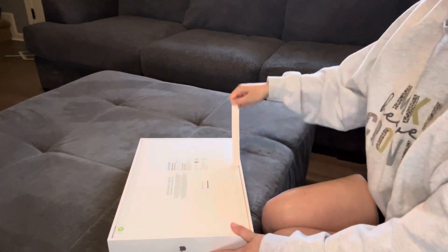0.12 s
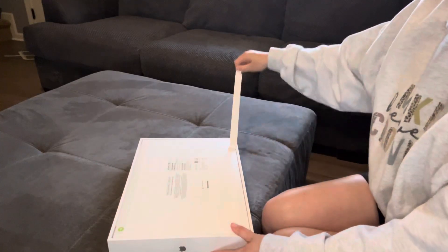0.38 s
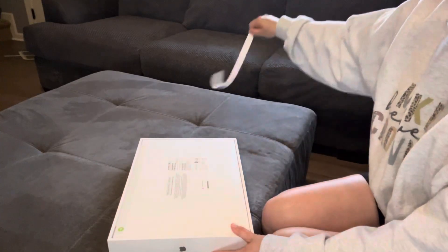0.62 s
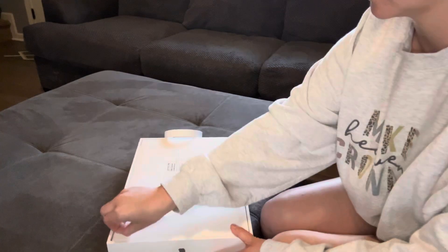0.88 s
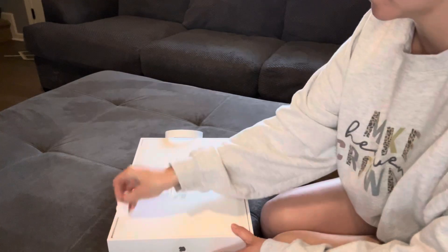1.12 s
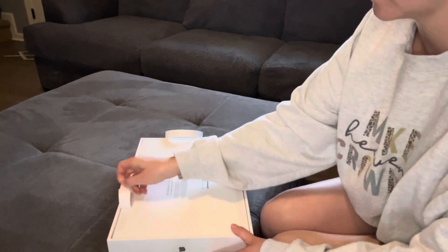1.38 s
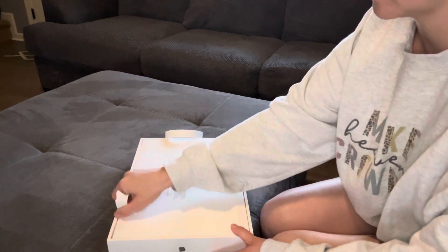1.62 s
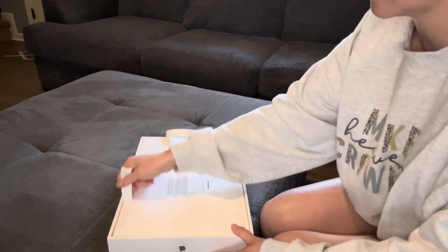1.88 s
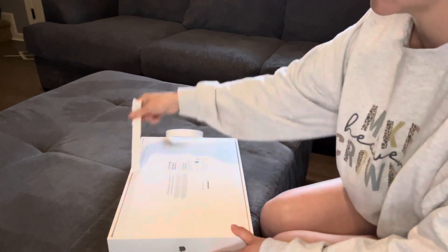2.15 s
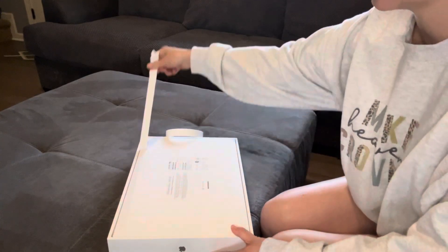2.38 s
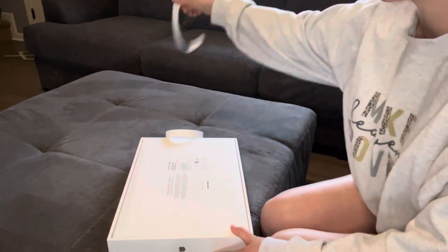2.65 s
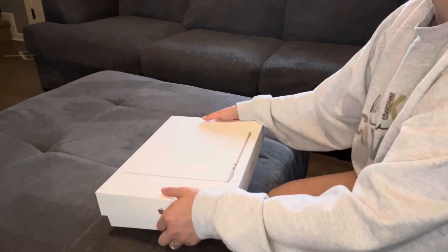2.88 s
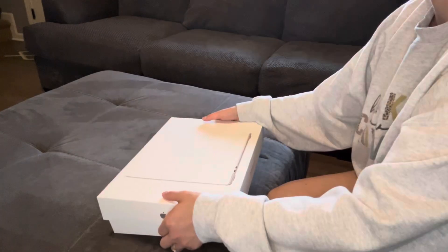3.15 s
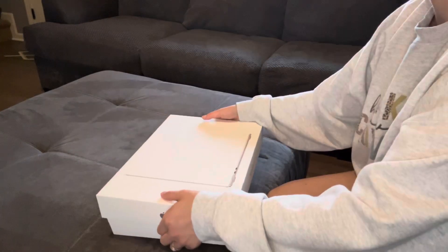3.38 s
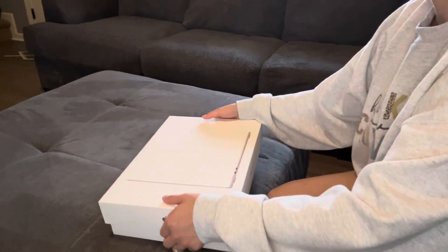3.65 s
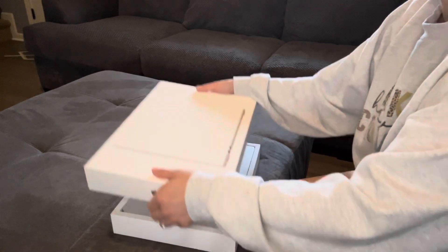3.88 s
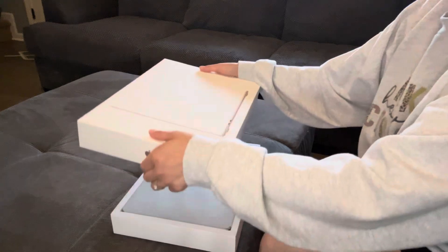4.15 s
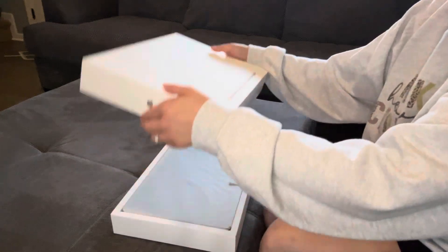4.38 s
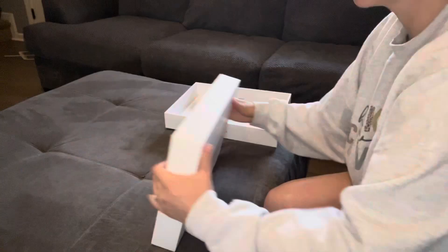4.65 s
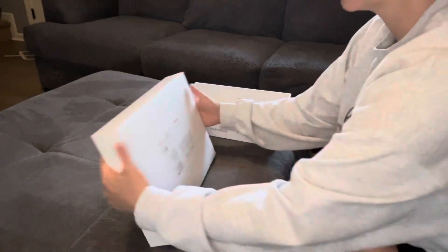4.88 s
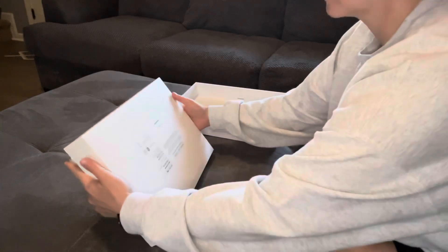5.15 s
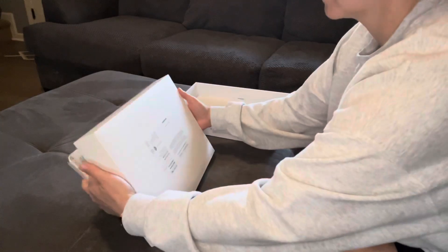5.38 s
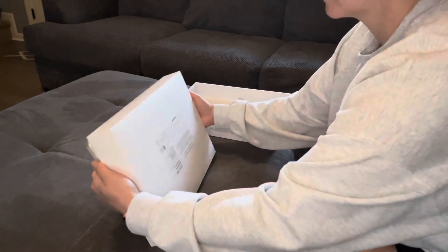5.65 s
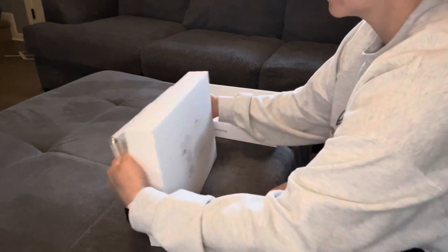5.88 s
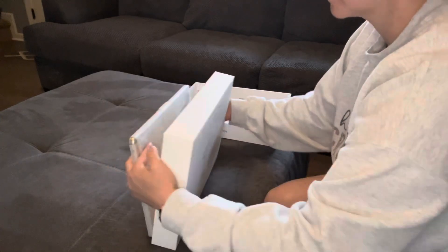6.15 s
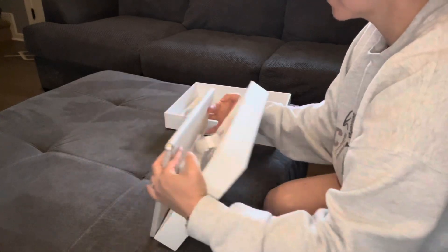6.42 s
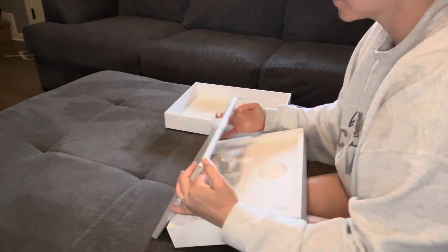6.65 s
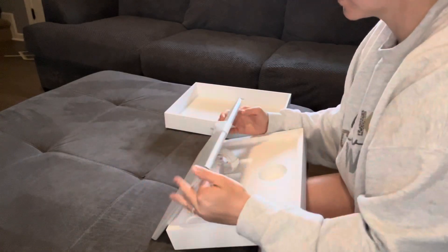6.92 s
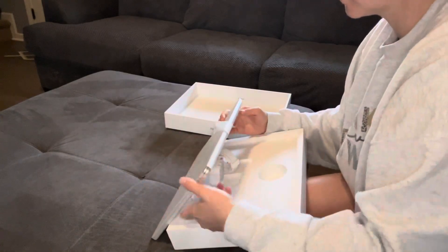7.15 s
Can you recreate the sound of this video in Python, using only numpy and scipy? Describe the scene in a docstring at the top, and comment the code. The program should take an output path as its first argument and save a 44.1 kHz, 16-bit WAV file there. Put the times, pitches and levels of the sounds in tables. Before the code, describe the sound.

A phone records box opening indoors, with faint hum and room noise. First comes a half-second dry paper tear, then rustling and tiny nail ticks, then another rising tear ending in a hard snap. After a cut, card rubs quietly and clicks as the lid comes away. Turning the box brings hollow knocks and scrapes, then one deep dull thump, light rattles and a last brief rustle.

```python
"""First one glued paper strip, later another, crackles off a cardboard box in a living room and snaps free;
noise grains and short jerks ring the strip and the box drones along; a nail ticks at a tab in between. Hands
slide the lid off, turn the box and tip it until it drops with a thump on a cushion: rubbed noise, knocks on
ringing panels and two low modes below a third. Five shots are joined by short fades; a mains hum and room
noise lie below. A phone hears it all with two microphone ports."""
import sys
import numpy as np
from scipy import signal
from scipy.fft import rfft, irfft
from scipy.io import wavfile

SR = 44100
rng = np.random.default_rng(int(sys.argv[2]) if len(sys.argv) > 2 else 0)


def log_audio(samples):
    """Write samples as a 16-bit WAV file to the path given in sys.argv[1]."""
    # one column per channel
    frames = np.atleast_2d(samples).T
    # limit to full scale, then quantise
    limited = np.clip(frames, -1, 1)
    pcm = np.round(limited * 32767).astype(np.int16)
    wavfile.write(sys.argv[1], SR, pcm)


def nominal_scale(level):
    """Amplitude ratio for a level in decibels (scalar or array-like)."""
    x = np.asarray(level, float) / 20
    return 10 ** x


N = 321048

# joins between the shots: t/s
CUTS_S = [0.782, 2.885, 4.686, 7.224]
# pull of the hand, one row of points per strip: t/s, level/dB about a steady pull
PULL = [
    [(0, 6.5), (.14, -5), (.3, -1.5), (.42, 3), (.45, -7), (.5, -6.5)],
    [(1.8, -28.5), (1.83, -7.5), (1.89, 0), (2.0, 3), (2.166, 6.5), (2.35, -1), (2.46, -1), (2.505, -5.5)],
]
# each strip at a steady pull: lower ring level/dB at the start, box drone level/dB
STRIPS = [(-69.5, -50.5), (-59.5, -45)]
# tone of torn paper fibres: f/Hz, relative level per Hz/dB
PAPER = [(400, -22.5), (700, -17.5), (1400, -9.5), (2800, -14.5), (3700, -1), (4650, -9), (5800, -0.5),
         (7200, -12), (8600, -13), (10500, -8), (12200, -1.5), (13000, -13), (16000, -22)]
# upper ring of the taut strip: f/Hz, relative level per Hz/dB
STRIP_HIGH = [(6000, -25.5), (8000, -7.5), (10300, -6.5), (12200, -7), (13200, -3), (16000, -20.5)]
# lower ring of the strip: f/Hz, relative level per Hz/dB
STRIP_MIDDLE = [(1500, -22), (3300, -16), (4200, -11.5), (4650, -4), (5100, -7.5), (5800, -8),
                (7500, -14.5), (9000, -33.5)]
# vigour of the hands on the box, one row of points per passage: t/s, level/dB about an easy grip
HANDS = [
    [(0.79, -8), (1.0, -6.5), (1.14, 15), (1.258, -1.5), (1.48, -11.5), (1.83, -1.5)],
    [(2.79, -20), (2.832, 3), (2.89, -8.5), (3.074, -11.5), (3.468, -4), (3.735, 4), (3.9, -9),
     (4.056, -34), (4.45, -3), (4.68, -22)],
    [(4.69, 6.5), (4.98, 6), (5.08, 1.5), (5.36, 9.5), (5.66, 2.5), (5.92, -10), (6.25, 3.5), (6.58, 20),
     (6.7, 14.5), (6.92, -1.5), (7.1, -24.5)],
    [(7.23, 4.5), (7.28, 21)],
]


def rms_one(x):
    """Scales a signal to rms 1."""
    return x / np.sqrt(np.mean(x ** 2) + 1e-20)


def at_hz(points, hz):
    """Reads a curve of (f/Hz, value) points along a log frequency axis."""
    points = np.array(points)
    return np.interp(np.log(hz + 1), np.log(points[:, 0]), points[:, 1])


def colour(x, spectrum):
    """Causal (minimum-phase) filter with unit energy that follows the shape of a spectrum."""
    log_gain = at_hz(spectrum, np.linspace(0, SR / 2, 4097)) * np.log(10) / 20
    # folding the cepstrum onto positive times makes the filter minimum-phase
    cepstrum = irfft(log_gain)
    cepstrum[1:4096] *= 2
    cepstrum[4097:] = 0
    h = irfft(np.exp(rfft(cepstrum)))
    return signal.oaconvolve(np.atleast_2d(x), [h / np.linalg.norm(h)])[:, :N]


def bandpass(x, edges_hz):
    """Passes one band with a Butterworth filter."""
    return signal.sosfilt(signal.butter(2, edges_hz, "band", fs=SR, output="sos"), x)


def drift(rate_hz):
    """Slow chance of spread 1: noise through two equal low-pass poles."""
    r = np.exp(-2 * np.pi * rate_hz / SR)
    slow = signal.lfilter([1], [1, -2 * r, r * r], rng.standard_normal(N + SR))
    return rms_one(slow[SR:])


def ring(clicks, hz, t60):
    """A unit click sets a sine of about height 1 ringing, which dies by 60 dB in t60 seconds."""
    r, w = nominal_scale(-60 / (t60 * SR)), 2 * np.pi * hz / SR
    return signal.lfilter([0, np.sin(w)], [1, -2 * r * np.cos(w), r * r], clicks + 1e-18)


def clicks_at(s, gain):
    """One-sample clicks of given heights at given seconds."""
    out = np.zeros(N)
    out[np.round(np.asarray(s) * SR).astype(int)] = gain
    return out


def grains(per_s, spread_db):
    """Random clicks of very uneven size and either sign; rms 1."""
    sizes = nominal_scale(spread_db * np.minimum(rng.exponential(1, N), 5)) * rng.choice([-1, 1], N)
    return rms_one(sizes * (rng.random(N) < per_s / SR))


def follow(passages, db, share):
    """Gain of a layer that takes a share of a control's swing; one row per passage, silent outside it."""
    t = np.arange(N) / SR
    gains = []
    for passage in passages:
        s, swing_db = np.transpose(passage)
        gains.append(nominal_scale(db + share * np.interp(t, s, swing_db)) * (t >= s[0]) * (t < s[-1]))
    return np.array(gains)


def patchy(x, patchy_db):
    """The strip bends as it lifts, so each narrow band swells and sinks on its own."""
    edges = 400 * 2 ** np.arange(0, 5.5, .4)
    return sum(nominal_scale(patchy_db * drift(15)) * bandpass(x, [low, high]) for low, high in zip(edges, edges[1:]))


def fibres():
    """Fibres crackle in clumps while the strip's lower ring grows as its free length grows."""
    lower_db = np.array(STRIPS)[:, :1]
    pulled_s = np.arange(N) / SR - np.array([[rows[0][0]] for rows in PULL])
    crackle = sum(follow(PULL, db=-46, share=0.88))
    rough = nominal_scale(4.0 * drift(60)) * (grains(4000, 4.0) + .4 * rng.standard_normal((2, N)))
    torn = patchy(colour(crackle * rough, PAPER), patchy_db=2.4)
    growing_db = lower_db + 13 * pulled_s  # 13 dB per second
    lower = sum(follow(PULL, db=0, share=0.74) * nominal_scale(growing_db))
    return torn + colour(lower * nominal_scale(3.0 * drift(80)) * grains(5000, 4.0), STRIP_MIDDLE)


def jerks_and_ticks():
    """Short crackling jerks: glue letting go, and from 1.2 to 1.5 s ticks of a nail picking at a tab."""
    # single jerks and nail ticks: t/s, level/dB
    single_jerks = [(0.0266, -39.5), (0.0514, -49), (0.0992, -34), (0.1246, -33.5), (0.1516, -33),
                    (0.2006, -34), (0.2255, -31.5), (0.254, -36.5), (0.2982, -33.5), (0.3245, -37),
                    (0.4636, -35), (1.2387, -42.5), (1.404, -46.5), (1.4177, -48), (1.4549, -46),
                    (1.893, -39.5), (1.9913, -38), (2.0267, -34), (2.069, -40), (2.14, -36), (2.1891, -36),
                    (2.2121, -39.5), (2.225, -32), (2.2405, -37), (2.2692, -32), (2.2747, -35.5),
                    (2.3134, -35.5), (2.3475, -36), (2.3511, -36.5), (2.372, -30.5), (2.388, -37),
                    (2.4134, -34), (2.4434, -35.5)]
    s, db = np.transpose(single_jerks)
    # small ones by chance while a strip is pulled, 20 ms apart on average
    luck = rng.random((400, 2))
    small_s = np.cumsum(0.02 * (.4 + 1.2 * luck[:, 0]))
    inside = small_s < N / SR - 1
    small = clicks_at(small_s[inside], nominal_scale(5.4 * (luck[inside, 1] - .5)))
    jerks = clicks_at(s, nominal_scale(db)) + sum(follow(PULL, db=-43.5, share=0.89)) * small

    PEAK_S = 0.0017  # time from the start of a jerk to its peak
    t = np.arange(round(.03 * SR)) / SR
    swell = t / PEAK_S * np.exp(1 - t / PEAK_S)

    def burst(clicks):
        """Each click becomes a few ms of dense crackle."""
        return signal.oaconvolve(clicks, swell)[:N] * grains(9000, 2.2)

    ring_share = nominal_scale(-6 + rng.normal(0, 5.1, N))
    upper = colour(burst(jerks), STRIP_HIGH)
    lower = colour(burst(jerks * ring_share), STRIP_MIDDLE)
    return upper + lower + colour(burst(jerks * nominal_scale(-8.5)), PAPER)


def box_drone():
    """The pull shakes the box, whose panels drone along as low coloured noise."""
    drone_db = np.array(STRIPS)[:, 1:]
    drone = sum(follow(PULL, db=0, share=0.39) * nominal_scale(drone_db))
    push = drone * nominal_scale(2.5 * drift(25)) * rng.standard_normal(N)
    # f/Hz, relative level per Hz/dB
    return colour(push, [(150, -13.5), (260, -15.0), (330, -1.0), (420, -10.0), (600, -18),
                         (900, -19.5), (1500, -25.0)])


def peeling():
    """Crackling fibres, short jerks and ticks, and the droning box add up."""
    return fibres() + jerks_and_ticks() + box_drone()


def box(s, db, centre_hz, width_oct):
    """A blow rings the panels near the pitch of its contact, each with its own strength and direction."""
    # box panels: f/Hz, t60/s
    panels = [(170, .05), (240, .045), (305, .045), (350, .04), (405, .04), (480, .03), (570, .028),
              (690, .022), (830, .02), (960, .017), (1120, .015), (1280, .014), (1500, .012), (1800, .01),
              (2150, .009), (2600, .008)]
    size = (len(s), len(panels))
    chance = nominal_scale(rng.normal(0, 2.0, size)) * rng.choice([-1, 1], size)
    out = 0
    for (hz, t60), luck in zip(panels, chance.T):
        near_db = -np.minimum(6 * (np.log2(hz / centre_hz) / width_oct) ** 2, 30)
        out = out + ring(clicks_at(s, nominal_scale(db + near_db) * luck), hz, t60)
    return out


def snaps():
    """The last glue tears with sharp clicks that ring the strip and kick the box."""
    # strip ends: t/s, click level/dB, lower ring over click/dB, 1-2 kHz box ring over click/dB, kick level/dB
    torn_ends = [(0.4956, -5, -26.5, -34, -32.5), (0.5041, 1, 1.5, -29.5, -26),
                 (2.4884, -4.5, -4, -28, -32), (2.507, 2, 0.5, -25.5, -26)]
    s, db, lower_db, panel_db, kick_db = np.transpose(torn_ends)
    strip = colour(clicks_at(s, nominal_scale(db)), STRIP_HIGH)
    strip = strip + colour(clicks_at(s, nominal_scale(db + lower_db)), STRIP_MIDDLE)
    panel = box(s, db + panel_db, 1450, width_oct=0.75)
    return strip + panel + box(s, kick_db, 280, width_oct=0.36)


def thump():
    """The box presses or drops on the cushion: a soft contact of a few ms rings the low modes."""
    # contacts with the cushion: t/s, level/dB
    landings = [(4.913, -46), (5.159, -44), (5.622, -44), (6.555, -36), (6.609, -9.5)]
    # box and cushion together: f/Hz, level/dB, t60/s
    cushion_modes = [(82, -1, 0.11), (121, -6.5, 0.082), (175, -18, 0.06)]
    s, push_db = np.transpose(landings)
    contact = np.hanning(round(0.0041 * SR))
    push = np.convolve(clicks_at(s, nominal_scale(push_db)), contact / contact.sum())[:N]
    return -sum(nominal_scale(db) * ring(push, hz, t60) for hz, db, t60 in cushion_modes)


def knocks():
    """Card knocks on card: panel ring plus a short noisy crack of the edges."""
    # t/s, panel ring level/dB, contact pitch f/Hz, edge crack level/dB
    card_blows = [(3.012, -56, 890, -81), (3.288, -55, 1270, -65), (3.457, -55, 920, -77),
                  (3.718, -50, 663, -56), (3.736, -38.5, 430, -52), (3.748, -42, 514, -60),
                  (3.751, -38.5, 1100, -44), (3.829, -34, 1360, -48), (3.8295, -41, 705, -65),
                  (4.243, -58, 1110, -79), (4.280, -49.5, 833, -44.5), (4.297, -48, 636, -59),
                  (4.405, -56, 1390, -70), (4.723, -49, 417, -62), (4.73, -39.5, 583, -68),
                  (4.865, -59, 1110, -66), (4.904, -39, 262, -59), (5.158, -51, 300, -72),
                  (5.232, -31.5, 1270, -53), (5.236, -33, 290, -51), (5.254, -35, 1730, -42),
                  (5.26, -36, 400, -56), (5.271, -42.5, 450, -45.5), (5.324, -58, 1500, -30.5),
                  (5.342, -49.5, 600, -34), (5.360, -28.5, 474, -37.5), (5.609, -46, 477, -62),
                  (6.023, -79, 2490, -56.5), (6.049, -46, 490, -55.5), (6.253, -41.5, 454, -39),
                  (6.333, -43, 378, -55), (6.530, -25.5, 620, -47), (6.531, -33, 1320, -62),
                  (6.590, -32.5, 646, -43), (6.602, -18, 820, -25), (6.607, -22, 323, -51),
                  (6.617, -41, 200, -54), (6.64, -32.5, 1400, -52), (6.705, -34, 430, -58),
                  (6.737, -39.5, 2600, -49), (6.82, -43, 600, -66), (6.869, -55, 1500, -61)]
    # tone of the card edges: f/Hz, relative level per Hz/dB
    edge_tone = [(500, -21.5), (1500, 9), (2800, 0), (5000, 2.5), (7200, -2), (10000, -7), (12300, -12),
                 (13200, -4), (16000, -31.5)]
    DECAY_MS, RISE_MS = 3.98, 0.52  # time constants of the crack
    s, db, centre_hz, crack_db = np.transpose(card_blows)
    fall, rise = np.exp(-1000 / (DECAY_MS * SR)), np.exp(-1000 / (RISE_MS * SR))
    edges = signal.lfilter([1], [1, -fall], clicks_at(s, nominal_scale(crack_db)) + 1e-18)
    edges = signal.lfilter([1 - rise], [1, -rise], edges)
    noise = rng.standard_normal(N) + 1.1 * rng.standard_normal((2, N))  # partly alike in both ports
    return box(s, db, centre_hz, width_oct=0.72) + colour(edges * noise, edge_tone)


def rattles():
    """Loose card ticks against the panels at chance moments, louder the harder the hands work."""
    luck = rng.random((500, 3))
    s = np.cumsum(0.033 * (.1 + 2 * luck[:, 0]))  # gaps of 3 to 69 ms
    inside = s < N / SR - .01
    luck, s = luck[inside], s[inside]
    vigour = sum(follow(HANDS, db=-62, share=0.84))
    return vigour * box(s, 14.0 * (luck[:, 1] - .5), 300 * 6 ** luck[:, 2], width_oct=0.47)


def handling():
    """Sliding shakes the panels, scrapes the card in fine grains and hisses off skin and cloth."""
    # shaken panels: f/Hz, relative level per Hz/dB
    rumble_tone = [(80, -39.5), (130, 5), (200, -5), (330, 4.5), (480, -6.5), (800, -12.5), (1300, -37)]
    # scraped card: f/Hz, relative level per Hz/dB
    scrape_tone = [(500, -40.5), (900, 5), (1500, -1), (2500, -7.5), (4000, -6.5), (6000, -40.5)]
    # skin and cloth: f/Hz, relative level per Hz/dB
    hiss_tone = [(2500, -22.5), (4500, -4), (6000, -0.5), (7200, -5.5), (9000, -5), (12000, -3.5),
                 (12900, -22.5), (16000, -57)]
    uneven = nominal_scale(1.5 * drift(20))

    def spread(x, side):
        """Adds noise of opposite sign in the two ports."""
        return uneven * (x + side * rng.standard_normal(N) * np.array([[1], [-1]]))

    rumble = sum(follow(HANDS, db=-62.5, share=0.22)) * spread(rng.standard_normal(N), 0.6)
    scrape = sum(follow(HANDS, db=-74.5, share=0.88)) * spread(grains(12000, 2.0), 0.6)
    hiss = sum(follow(HANDS, db=-73.5, share=1)) * spread(grains(12000, 1.5), 0.92)
    return colour(rumble, rumble_tone) + colour(scrape, scrape_tone) + colour(hiss, hiss_tone)


def swells():
    """Swells of fine grains in one broad band: sliding strokes, and at 0.435 s a burst of box drone."""
    # t/s, length/s, level/dB (rms ahead of the swell), centre f/Hz
    single_swells = [(.435, 0.071, -52.5, 332), (0.951, 0.078, -54, 9200), (0.962, 0.34, -60.5, 3240),
                     (1.063, 0.22, -49.5, 130), (1.121, 0.15, -46, 317), (1.195, 0.085, -51, 9300),
                     (1.364, 0.041, -53, 10200), (1.505, 0.33, -65, 9200), (2.942, 1, -70.5, 930),
                     (3.25, 0.035, -75, 1500), (3.728, 0.097, -59.5, 3430), (4.219, 0.15, -65.5, 9250),
                     (4.383, 0.07, -69, 1690), (4.41, 0.12, -66.5, 9550), (4.53, .086, -65, 7000),
                     (4.94, .12, -62, 9500), (5.116, 0.21, -45, 252), (5.326, 0.099, -51.5, 9530),
                     (5.592, 0.13, -59.5, 1640), (5.711, 0.044, -53, 664), (5.625, 0.21, -60, 9000),
                     (6.09, 0.13, -66.5, 8800), (6.346, 0.16, -49, 1400), (6.894, .138, -58.5, 8500),
                     (7.214, 0.11, -51.5, 9300), (7.221, 0.096, -48.5, 1500)]
    WIDTH_OCT = 1.4
    out = np.zeros((2, N))
    fine = grains(14000, 2.0) + .5 * rng.standard_normal((2, N))
    for start, length, db, hz in single_swells:
        a, swell = round(start * SR), np.sqrt(np.hanning(round(length * SR)))
        b = min(a + len(swell), N)
        edges = np.clip(hz * 2 ** (np.array([-.5, .5]) * WIDTH_OCT), 20, .45 * SR)
        band = bandpass(fine[:, a - 2000:b], edges)[:, 2000:]  # the filter settles before the swell
        out[:, a:b] += nominal_scale(db) * rms_one(band) * swell[:b - a]
    return out


def at_ports(dry):
    """Direct sound reaches the nearer port first, so one port lags and the level leans to one side."""
    # where the hands work, left or right of the phone: from t/s, left port lag/ms, left over right level/dB
    hand_places = [(0, .072, -.3), (.786, -.065, -.8), (1.8, -.045, -1), (2.48, -.02, 0),
                   (2.886, .045, -.4), (4.686, -.08, -1.6), (6.0, .1, -1.6)]
    out, hz = np.zeros((2, N)), np.fft.rfftfreq(N, 1 / SR)
    starts = [round(s * SR) for s, *place in hand_places] + [N]
    for a, b, (s, lag_ms, left_db) in zip(starts, starts[1:], hand_places):
        turn = np.exp(-1j * np.pi * np.outer([1, -1], hz * lag_ms / 1000))  # half the lag on each port
        moved = irfft(rfft(dry) * turn, N)
        out[:, a:b] = moved[:, a:b] * nominal_scale([[left_db / 2], [-left_db / 2]])
    return out


def room_echo():
    """Noise swells in up to the first wall and dies band by band, one for each port, with two early echoes."""
    # room tail: f/Hz, t60/s, relative level/dB, left-right likeness
    room_bands = [(104, 0.39, 1.5, 1), (400, 0.53, 7, 0.067), (1500, 0.51, 2, 0.07),
                  (3183, 0.6, 6.5, 0.073), (5000, 0.6, -3.5, 0.11), (7000, 0.55, 1, 0.26),
                  (12130, 0.45, -7, .2)]
    # single early echoes: delay/s, level/dB
    early_walls = [(0.016, -26), (0.0253, -23.5)]
    FIRST_WALL_S, ROOM_DB = 0.014, -5.5
    t, rows = np.arange(round(.9 * SR)) / SR, np.array(room_bands)
    edges = 50 * 2 ** np.arange(0, 8.6, .5)
    # neighbouring bands take different noise
    white, tail = rng.standard_normal((2, 2, len(t))), 0
    for k, (low, high) in enumerate(zip(edges, edges[1:])):
        t60, db, alike = (at_hz(rows[:, [0, c]], np.sqrt(low * high)) for c in (1, 2, 3))
        mid, side = bandpass(white[k % 2], [low, high])
        alike = np.clip(alike, 0, 1)
        both = np.sqrt(1 + alike) * mid + np.sqrt(1 - alike) * side * [[1], [-1]]
        tail = tail + nominal_scale(db - 60 * t / t60) * both
    echo = nominal_scale(ROOM_DB) * tail * np.clip(t / FIRST_WALL_S, 0, 1) ** 3 / np.sqrt(SR / 10)
    for delay_s, db in early_walls:
        echo[:, round(delay_s * SR)] += nominal_scale(db)
    return echo


def background():
    """Room noise, its likeness in the two ports set by frequency, and a wavering mains hum."""
    # room noise: f/Hz, relative level per Hz/dB
    air_tone = [(15, -20), (25, -10), (63, 1), (164, -9), (213, -2.5), (257, -13.5), (318, -18.5),
                (392, -6), (554, -39.5), (1050, -28), (1560, -42), (4600, -46.5), (10500, -53),
                (14000, -66.5)]
    # room noise in the two ports: f/Hz, left-right likeness
    air_likeness = [(60, 0.73), (250, 0.93), (1000, .5), (4000, 0.22), (9000, 0.54)]
    # mains hum: f/Hz, level/dB before 1 dB of lift and the wavering
    hum_tones = [(59.5, -59.5), (119, -67)]
    likeness_hz, alike = np.transpose(air_likeness)
    alike = np.clip(alike, 0, .999)

    def part(share):
        """Noise whose power follows a share over frequency."""
        power = at_hz(np.c_[likeness_hz, share], np.fft.rfftfreq(N, 1 / SR))
        return irfft(rfft(rng.standard_normal(N)) * np.sqrt(power), N)

    air = colour(part((1 + alike) / 2) + part((1 - alike) / 2) * np.array([[1], [-1]]), air_tone)
    t, hum = np.arange(N) / SR, 0
    for hz, db in hum_tones:
        height = nominal_scale(db + 1.0 + 3.1 * drift(2.7))
        hum = hum + height * np.sin(2 * np.pi * hz * t + 0.42 * drift(0.84))
    return nominal_scale(-61.5) * air + hum


def scene():
    """Box and hands, direct and echoed, over the room; each shot carries only its own echoes."""
    dry = peeling() + snaps() + thump() + knocks() + rattles() + handling() + swells()
    out, echo = at_ports(dry) + background(), room_echo()
    joins = [0] + [round(s * SR) for s in CUTS_S] + [N]
    for a, b in zip(joins, joins[1:]):
        out[:, a:b] += signal.fftconvolve(dry[None, :, a:b].mean(1), echo)[:, :b - a]
    return out


def low_pass(x):
    """Removes everything above the highest recorded frequency."""
    return signal.sosfilt(signal.butter(12, 17100, fs=SR, output="sos"), x)


def record(dry):
    """In the top treble both channels mostly share one port, phase-shifted; shots fade at the joins."""
    # microphone roll-off: f/Hz, gain/dB
    mic_top = [(12400, 0), (13000, -12), (16000, -22)]
    # top treble: f/Hz, lead of the left channel/rad
    port_phase = [(7600, -1.5), (8600, -.55), (9650, 0), (10700, .4), (11700, 1.4), (12750, 2.6),
                  (13800, 3.1)]
    MIXED_ABOVE_HZ, BASS_CUT_HZ, LEFT_DB, FADE_S = 8240, 45, 0.35, 0.027
    hz = np.fft.rfftfreq(N, 1 / SR)
    both = rfft(dry) * nominal_scale(at_hz(mic_top, hz))
    lead = np.exp(.5j * np.outer([1, -1], at_hz(port_phase, hz)))
    shared = both[0] * nominal_scale([[0.1], [0.6]]) * lead
    top = 1 / (1 + np.exp(-(hz - MIXED_ABOVE_HZ) / 500))
    mixed = (1 - top) * both + top * (1.136 * shared + 0.13 * both)
    ports = irfft(mixed, N) * nominal_scale([[LEFT_DB / 2], [-LEFT_DB / 2]])
    ports = signal.sosfilt(signal.butter(4, BASS_CUT_HZ, "high", fs=SR, output="sos"), ports)
    # fade out before each join and in after it
    away_s = np.min(np.abs(np.arange(N)[:, None] / SR - CUTS_S), axis=1)
    mix = ports * np.clip(away_s / FADE_S, .02, 1) ** 0.92
    return low_pass(mix)


dry = scene()
out = record(dry)
log_audio(out)
```